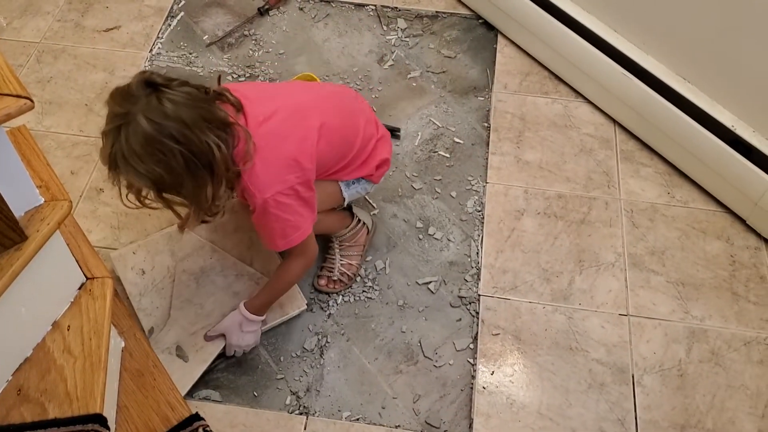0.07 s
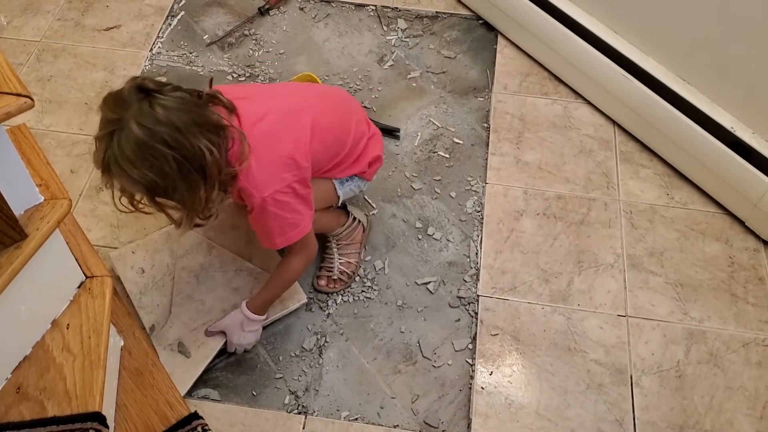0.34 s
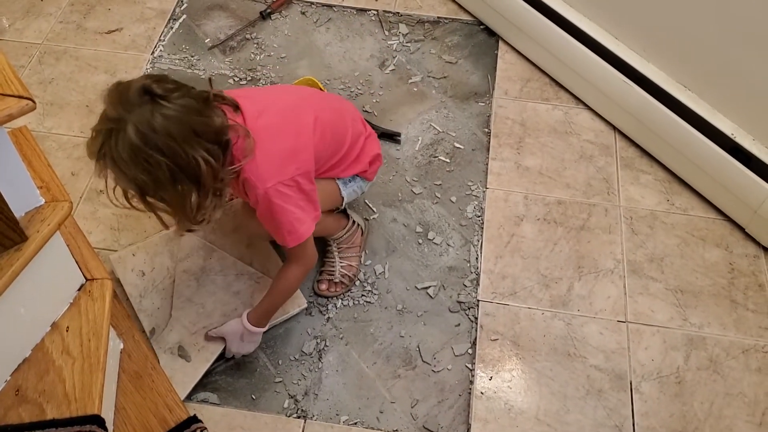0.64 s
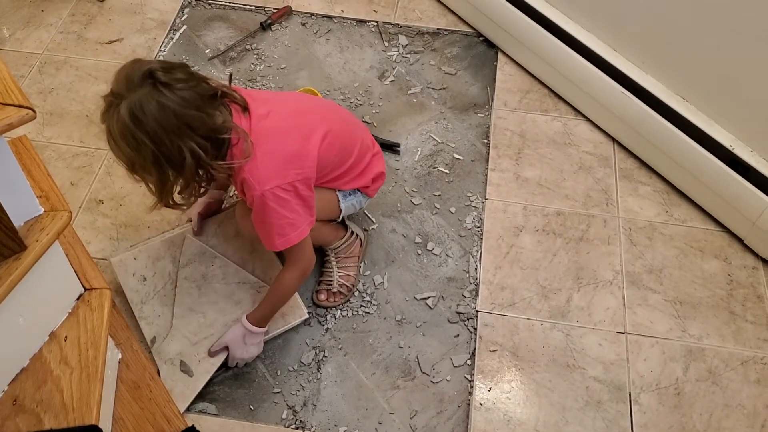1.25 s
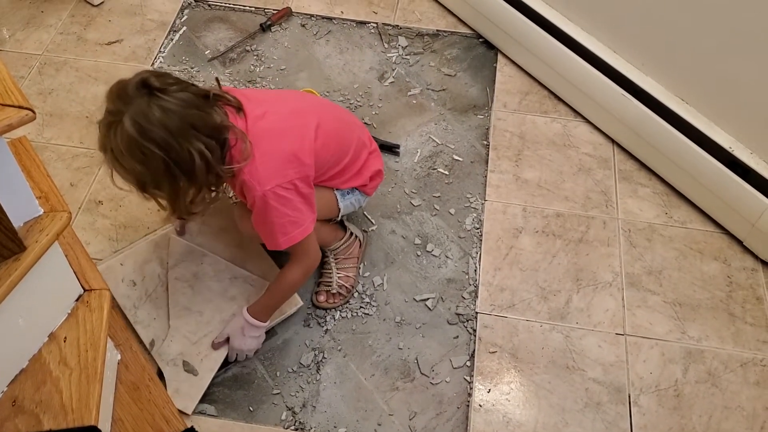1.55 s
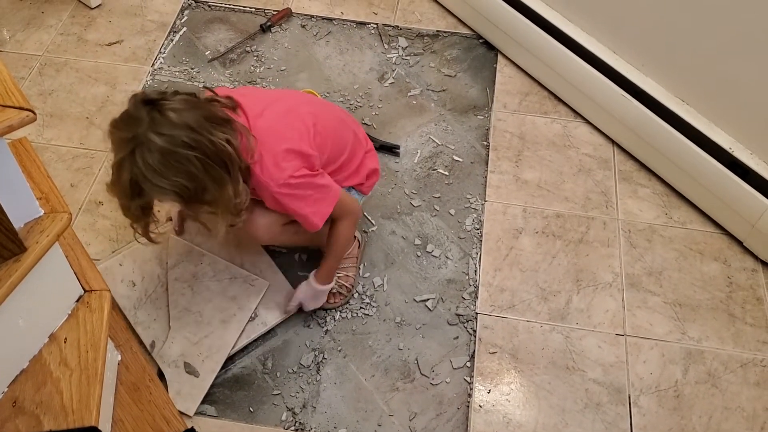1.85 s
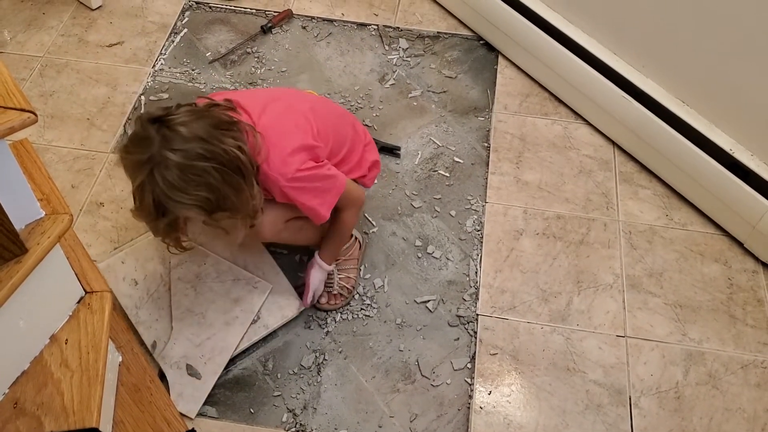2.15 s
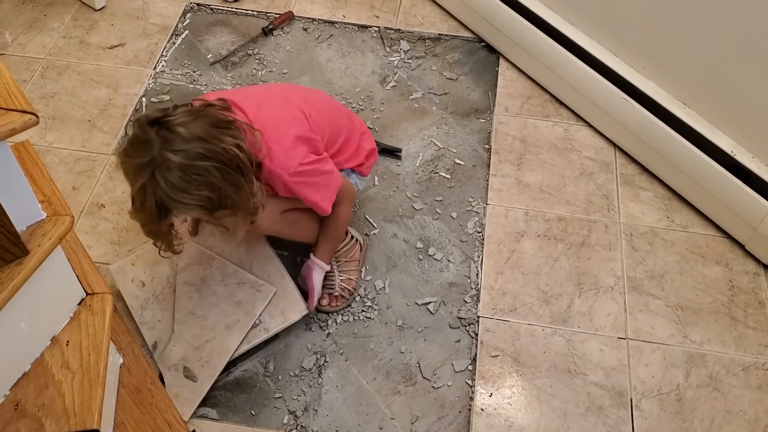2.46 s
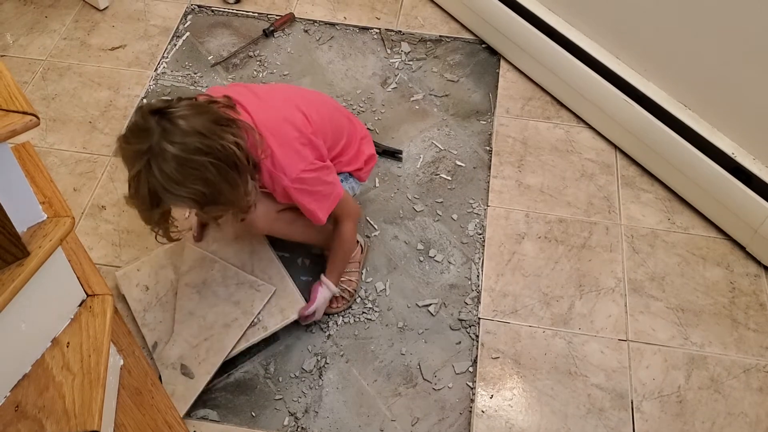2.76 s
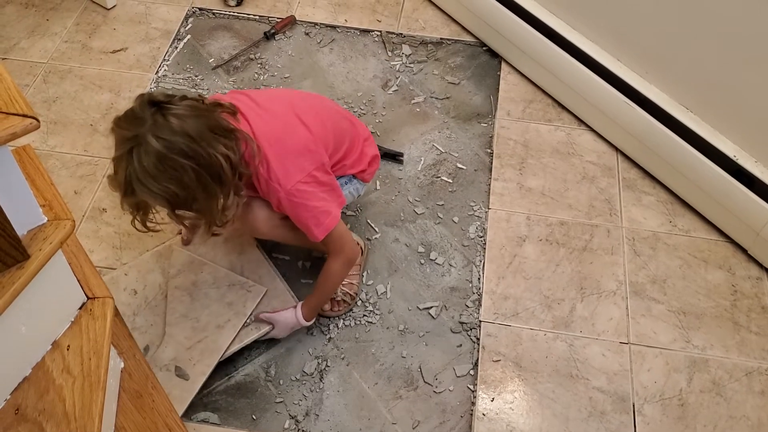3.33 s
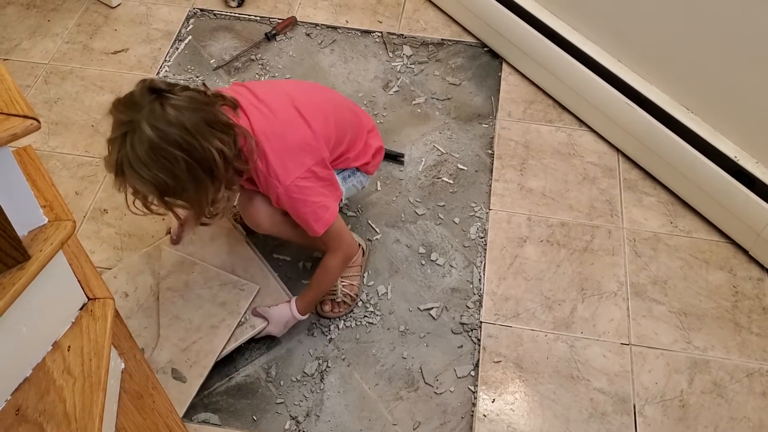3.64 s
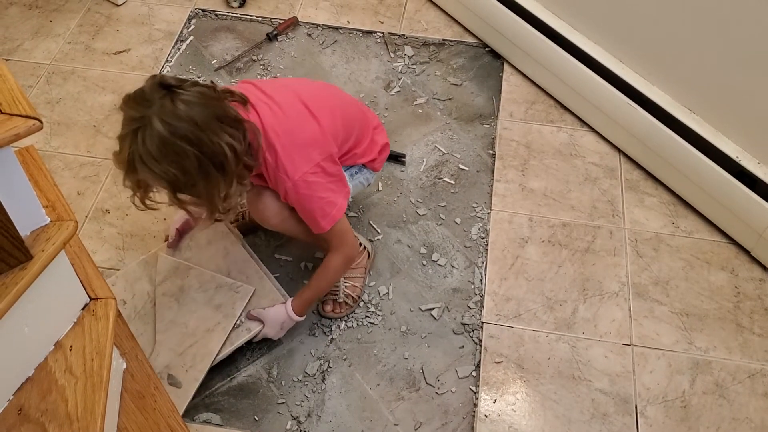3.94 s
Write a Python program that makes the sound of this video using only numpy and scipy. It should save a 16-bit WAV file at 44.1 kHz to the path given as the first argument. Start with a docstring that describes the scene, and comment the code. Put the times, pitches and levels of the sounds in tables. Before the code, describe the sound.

Close, gritty scraping of a floor tile comes in two drags, one long and one short, with a low scuff between. Tile edges clack, then a tile is put down with a heavy rattle that rings in the hard-walled room.

```python
"""A bare, ringing room: heavy ceramic floor tiles are dragged over gritty concrete.
Crushed grit rings the sliding tile, stick-slip makes it groan and squeal, powder hisses under it.
A long drag with one bump is followed by a low scuff and a shorter drag that ends in a bright clack.
After a few light taps a tile is set down on the stack with a heavy rattle, and crumbs settle.
Each knock is a crack of chattering edges plus the tile's decaying modes."""
import sys
import numpy as np
from scipy import signal
from scipy.fft import rfft, irfft, next_fast_len
from scipy.io import wavfile

SR = 44100
rng = np.random.default_rng(int(sys.argv[2]) if len(sys.argv) > 2 else 0)


def master(y):
    """Save y as 16-bit WAV."""
    cut = np.clip(np.atleast_2d(y).T, -1, 1)
    pcm = np.round(cut * 32767)  # scale
    wavfile.write(sys.argv[1], SR, pcm.astype(np.int16))


N = 176400
TIME = np.arange(N) / SR
JUDDER_DB, JUDDER_HZ = 1, 43.6
# stereo side gain against mid (frequency [Hz], gain [dB])
SIDE_GAIN = [(100, -14.5), (280, -14.5), (550, -6), (1100, 0.5), (3000, 1), (14000, 1.5)]


def drags():
    """Two drags: grit shakes the sliding tile, which rings in its resonances."""
    # grinding (time [s], level [dB])
    long_curve = [(0, -20.5), (.1, -22.5), (.25, -20), (.4, -19.5), (.55, -20), (.68, -22), (.82, -18),
                  (.95, -19.5), (1.05, -22), (1.2, -22), (1.32, -26.5), (1.4, -24.5), (1.5, -29.5),
                  (1.6, -31), (1.7, -31), (1.8, -50)]
    short_curve = [(1.68, -46), (1.74, -25), (1.95, -24), (2.05, -22), (2.13, -21.5), (2.18, -25),
                   (2.28, -22.5), (2.32, -26), (2.36, -35), (2.41, -31), (2.44, -27), (2.49, -30.5),
                   (2.6, -33), (2.8, -42.5), (2.87, -54)]
    # spectra (frequency [Hz], level [dB])
    long_tone = [(60, -39), (120, -26), (170, -28), (220, -19), (340, -20), (430, -9), (540, -7), (830, -2),
                 (1200, -5.5), (1600, -3.5), (2300, -2.5), (3600, 0), (5000, -3.5), (6300, -8.5),
                 (8000, -16.5), (16000, -47)]
    short_tone = [(59, -49), (100, -17), (282, -8), (327, -19.5), (621, -2), (695, -10), (994, -3),
                  (1750, -2.5), (2150, -3.5), (4740, -7), (9000, -27.5), (11700, -59), (19800, -120)]
    # tile resonances (frequency [Hz], width [Hz], level [dB])
    resonances = [(636, 28, -2), (870, 180, -1.5), (1045, 170, 3), (1535, 86, 8.5), (1710, 120, 6.5),
                  (1966, 170, 5.5), (2800, 420, -1), (4500, 160, -3)]
    out = np.zeros(N)
    for curve, tone, ring_db in (long_curve, long_tone, -1), (short_curve, short_tone, -7):
        def body_db(f):
            peaks = sum(amp(db + ring_db) ** 2 / (1 + (2 * (f - hz) / width_hz) ** 2)
                        for hz, width_hz, db in resonances)
            return read(tone, f) + 10 * np.log10(1 + peaks)
        out += level(curve) * evened(colour(grit(per_s=2500, spread_db=4), body_db, size=16384))
    return out


def groan():
    """The tile sticks and slips unevenly; each slip rings its bending modes."""
    # stick-slip (time [s], level [dB], slip rate [1/s])
    slip_curve = [(0.082, -42, 76), (.18, -39, 74), (.29, -39, 77), (.361, -37, 82), (.548, -32.5, 83),
                  (.66, -34, 80), (0.759, -29.5, 84.4), (.89, -28.5, 83), (0.982, -34, 90),
                  (1.061, -34, 66), (1.249, -46, 81), (1.35, -60, 69)]
    # bending modes (frequency [Hz], width [Hz], level [dB])
    bending_modes = [(165.3, 6.4, -6.5), (565, 10, -5), (655, 11, 6.5), (786, 18, 3.5), (796, 22, 6),
                     (844, 20, 5.5), (915, 12, -1), (1580, 32, -9), (1630, 17, -11), (1840, 43, 0),
                     (3014, 42, -1)]
    times_s, _, slips_per_s = np.transpose(slip_curve)
    cycles = np.cumsum(np.interp(TIME, times_s, slips_per_s) * (1 + .018 * wobble(60))) / SR
    slips = np.diff(np.floor(cycles), prepend=0) * amp(2 * rng.standard_normal(N))
    t = TIME[:SR // 4]
    body = sum(amp(db) * width_hz * np.exp(-np.pi * width_hz * t) * np.sin(2 * np.pi * hz * t)
               for hz, width_hz, db in bending_modes)
    body = signal.sosfilt(signal.butter(4, 144, "high", fs=SR, output="sos"), body)
    return level(slip_curve) * evened(signal.fftconvolve(slips, body)[:N])


def tile_drop():
    """A tile lands on the stack and rocks to rest: (cracks, ringing)."""
    # contacts (time [s], crack [dB], ring [dB], chatter [s], tilt [dB/octave])
    hits = [(3.332, -50, -69, .017, -6), (3.358, -27.5, -35.5, 0.012, 0.5), (3.376, -30, -37, 0.044, -1.5),
            (3.398, -30, -30.5, .027, -2), (3.432, -31.5, -41, 0.043, -2.5), (3.5, -38.5, -57, 0.1, -1.5)]
    # spectrum (frequency [Hz], level [dB])
    crack_tone = [(24, -54), (40, -45), (174, -24), (213, -44), (260, -15.5), (340, -35), (420, -21),
                  (500, -15.5), (700, -12.5), (830, -11), (1000, -9.5), (1400, -8.5), (1900, -9),
                  (2710, -10), (5170, -17), (6200, -23), (7400, -36), (11500, -36.5), (15500, -50)]
    # (frequency [Hz], level [dB], t60 [s])
    tile_modes = [(546, 8, .45), (643, -2, .35), (812, 5, .42), (926, -5, .5), (1420, 1, .25),
                  (1553, -2, .16), (1760, -4, .38), (2210, -7, .4), (2514, -11, .4), (2633, -1, .25),
                  (2960, -9, .45), (5157, -13, .3)]
    return cracks(hits, crack_tone, first_touch=.15), ringing(hits, tile_modes)


def tile_clack():
    """Tile edge strikes tile edge: (cracks, ringing)."""
    # contacts (time [s], crack [dB], ring [dB], chatter [s], tilt [dB/octave])
    hits = [(2.508, -31, -47, .0085, 3), (2.514, -28.5, -37, 0.015, 0.5), (2.548, -37, -38.5, 0.059, -1.5)]
    # spectrum (frequency [Hz], level [dB])
    crack_tone = [(35, -59), (60, -16.5), (285, -11.5), (509, -28), (688, -22), (900, -3), (1100, -9),
                  (1500, -11), (2000, -2), (3200, -2.5), (4220, -7), (4630, -6.5), (6200, -14.5),
                  (8280, -30.5), (12300, -29.5), (15500, -41)]
    # (frequency [Hz], level [dB], t60 [s])
    tile_modes = [(275, -19, .48), (908, 0, .25), (987, 3, .65), (1006, 0, .5), (1900, -5, .35),
                  (1941, -5, .25), (2030, -3, .5), (2902, -5, .25), (3000, -7, .3), (3270, -6, .3),
                  (3838, -6, .22), (4592, -2, .16)]
    return cracks(hits, crack_tone, first_touch=.14), ringing(hits, tile_modes)


def tile_bump():
    """The dragged tile trips over a ridge: (cracks, ringing)."""
    # contacts (time [s], crack [dB], ring [dB], chatter [s], tilt [dB/octave])
    hits = [(.406, -37.5, -42, .012, -7.5), (.417, -32, -32.5, 0.013, -1.5), (.431, -40.5, -41, 0.0081, -6)]
    # spectrum (frequency [Hz], level [dB])
    crack_tone = [(100, -28), (350, -8), (600, -3.5), (900, 3.5), (1750, 4), (2300, 1.5), (5000, -28),
                  (15000, -50)]
    # (frequency [Hz], level [dB], t60 [s])
    tile_modes = [(811, -6, .2), (956, -0.5, 0.29), (1170, -3, .18), (1280, -5, 0.1), (1440, 2, 0.15),
                  (1685, 1.5, 0.12)]
    return cracks(hits, crack_tone, first_touch=.36), ringing(hits, tile_modes)


def cracks(hits, tone, first_touch):
    """Each contact gives a broad crack as the edges chatter."""
    out = np.zeros(N)
    for start_s, db, _, chatter_s, db_per_octave in hits:
        def crack_db(hz):
            return read(tone, hz) + db_per_octave * np.log2(np.clip(hz, 400, 8000) / 1000)
        crack = colour(contact(chatter_s, first_touch), crack_db)
        add(out, start_s, amp(db) * np.sqrt(SR) * unit(crack))
    return out


def ringing(hits, modes):
    """Each contact feeds energy into the tile's modes, which ring down."""
    out = np.zeros(N)
    for hz, mode_db, t60_s in modes:
        decay = unit(amp(-60 * TIME[:SR] / t60_s))
        energy = np.zeros(N)
        for start_s, _, ring_db, _, _ in hits:
            add(energy, start_s, SR * (amp(ring_db + mode_db) * decay) ** 2)
        out += np.sqrt(2 * energy) * np.sin(2 * np.pi * (hz * TIME + rng.random()))
    return out / np.linalg.norm([amp(db) for _, db, _ in modes])


def scuffs():
    """Close rubbing: (low rumble, thin high rasp)."""
    # (time [s], rumble [dB], rasp [dB])
    rub_curve = [(0, -24.5, -19.5), (.04, -31.5, -27), (.08, -48, -57), (.7, -55, -52), (.9, -72, -50),
                 (1.3, -47, -65), (1.4, -32, -49), (1.48, -40.5, -63), (1.68, -40, -65),
                 (1.715, -28, -27.5), (1.81, -26.5, -22), (1.92, -27, -27.5), (1.98, -28, -35.5),
                 (2.2, -48, -44), (2.5, -40, -62), (2.7, -70, -69)]
    # spectra (frequency [Hz], level [dB])
    rumble_tone = [(30, -24), (65, -5), (100, -4.5), (150, 1.5), (260, 1.5), (400, 5.5), (900, 4.5),
                   (1600, 1), (4000, -33), (12000, -50)]
    rasp_tone = [(4000, -19.5), (8500, -21), (9900, -15.5), (11200, -17), (11750, -8), (12080, 3),
                 (12500, -10), (13400, -13), (14200, -19), (16000, -24)]
    rumble = level(rub_curve) * diffuse(rumble_tone) * amp(JUDDER_DB * wobble(JUDDER_HZ))
    grains = np.array([toned(grit(per_s=3300, spread_db=3), rasp_tone) for _ in range(2)])
    rasp = level(rub_curve, column=2) * grains
    return rumble, rasp * amp([[2.5], [-2.5]])


def powder():
    """Fine dust hisses under the moving tile."""
    # (time [s], level [dB])
    hiss_curve = [(0, -33), (.3, -31.5), (.55, -30), (.73, -28.5), (.9, -31.5), (1.15, -34.5), (1.4, -36),
                  (1.52, -42.5), (1.65, -39.5), (2.0, -38), (2.3, -41.5), (2.38, -43), (2.45, -44),
                  (2.6, -56), (2.8, -50.5), (2.87, -73), (3.1, -61.5), (3.25, -53.5), (3.32, -78)]
    # spectrum (frequency [Hz], level [dB])
    hiss_tone = [(3000, -20), (6500, -14), (8500, -1.5), (10000, 2.5), (11000, 1), (12300, 4), (14000, -4),
                 (16000, -7.5)]
    return level(hiss_curve) * toned(grit(per_s=6900, spread_db=.5), hiss_tone)


def grates(grains_per_s=4200, edge_s=.018):
    """Grains crushed under an edge tick through one resonance: short, rough rasps."""
    # (time [s], length [s], centre [Hz], width [Hz], level [dB])
    caught_grit = [(.9, 0.14, 1720, 549.5, -29.5), (2.177, 0.093, 4850, 450, -30),
                   (2.185, 0.064, 6500, 1500, -40), (2.25, 0.082, 3700, 220, -29),
                   (2.404, 0.047, 5200, 400, -31.5), (3.557, .13, 12900, 200, -63),
                   (3.781, 0.1, 11700, 1500, -54.5), (3.884, 0.038, 10900, 400, -48),
                   (3.887, 0.036, 7800, 600, -59), (3.885, 0.053, 13000, 3000, -56)]
    t, out = TIME[:SR // 2], np.zeros(N)
    for start_s, length_s, hz, width_hz, db in caught_grit:
        grains = rng.standard_normal(len(t)) * (rng.random(len(t)) < grains_per_s / SR)
        rasp = colour(grains, lambda f: -10 * np.log10(1 + ((f - hz ** 2 / (f + 1)) / width_hz) ** 2))
        gate = np.clip(np.minimum(t, length_s - t) / edge_s, 0, 1)
        add(out, start_s, amp(db) * gate * evened(rasp))
    return out


def squeaks(edge_s=.0069):
    """Friction holds one mode in a short, unsteady squeal."""
    # (time [s], length [s], pitch [Hz], width [Hz], level [dB])
    squeals = [(.184, .18, 570.4, 8.1, -32), (.2, 0.11, 785, 20, -29), (0.553, 0.38, 7800, 120, -38),
               (2.238, 0.31, 624, 13.6, -38.5), (3.218, 0.11, 2880, 150, -45),
               (3.223, 0.067, 3660, 180, -43), (3.234, .15, 863, 43, -45), (3.26, 0.069, 564, 25, -46),
               (3.262, .1, 1647, 150, -47)]
    t, out = TIME[:SR // 2], np.zeros(N)
    for start_s, length_s, hz, width_hz, db in squeals:
        gate = np.clip(np.minimum(t, length_s - t) / edge_s, 0, 1)
        cycles = np.cumsum(hz + .5 * width_hz * wobble(width_hz, len(t))) / SR
        falter = 1 + .45 * wobble(width_hz, len(t))
        add(out, start_s, amp(db) * gate * falter * np.sin(2 * np.pi * cycles))
    return out


def taps(skirt_db=-19, top_hz=3720):
    """Light bumps of a hand-held tile: one damped, broad resonance each."""
    # contacts (time [s], level [dB], centre [Hz], width [octaves], chatter [s])
    hits = [(2.992, -48.5, 1500, 0.31, 0.0029), (3.029, -55.5, 1170, 0.84, 0.039),
            (3.222, -49.5, 1610, 0.14, .014), (3.238, -52.5, 2360, 1.2, 0.019),
            (3.81, -52.5, 630, 1.1, 0.03), (3.891, -58, 3500, 3.8, .02), (3.912, -57, 1100, 3.2, 0.013)]
    out = np.zeros(N)
    for start_s, db, centre_hz, octaves, chatter_s in hits:
        def body_db(hz):
            bell = np.exp(-.5 * (np.log2((hz + 1) / centre_hz) / octaves) ** 2)
            return 20 * np.log10(bell + amp(skirt_db)) - 10 * np.log10(1 + (hz / top_hz) ** 4)
        tap = colour(contact(chatter_s, first_touch=.65), body_db)
        add(out, start_s, amp(db) * np.sqrt(SR) * unit(tap))
    return out


def thuds():
    """The landing tile shakes the floor: a short swell of bass."""
    # (time [s], level [dB], swell [s])
    landings = [(3.375, -44, 0.051)]
    # spectrum (frequency [Hz], level [dB])
    thud_tone = [(25, -23), (50, -4), (68, 5), (100, -2), (170, -14), (300, -29), (1500, -60)]
    out = np.zeros(N)
    for start_s, db, swell_s in landings:
        age = np.maximum(TIME - start_s, 0) / swell_s
        out += amp(db) * age * np.exp(1 - age) * toned(rng.standard_normal(N), thud_tone)
    return out


def room(x, wet_db, change_s, count):
    """Direct sound plus reflections; count responses crossfade in turn as the tile moves."""
    size = next_fast_len(N + SR, real=True)
    wet = 0
    for k in range(count):
        away = abs((TIME / change_s - k) % count - count / 2)
        share = np.cos(np.pi / 2 * np.minimum(away, 1))
        wet = wet + rfft(x * share, size) * rfft(echoes(), size)
    return (x + amp(wet_db) * irfft(wet, size)[:, :N]) / np.sqrt(1 + amp(wet_db) ** 2)


def echoes(onset_s=.0024, early_db=7.5, early_s=.06):
    """Impulse response of hard floor and walls: dense early reflections, then a tail."""
    # (frequency [Hz], t60 [s])
    room_t60 = [(80, 1), (250, 0.8), (1000, 0.52), (3000, 0.7664), (6000, 0.59), (13000, 0.81)]
    hz, t, spectra = signal.stft(rng.standard_normal((2, SR)), SR, nperseg=256)
    decay = amp(-60 * t / read(room_t60, hz)[:, None] + early_db * np.exp(-t / early_s))
    onset = np.minimum(TIME[:SR] / onset_s, 1) ** 2
    mid, side = signal.istft(spectra * decay, SR, nperseg=256)[1][:, :SR] * onset
    return left_right(unit(mid), unit(side))


def background():
    """Faint, steady indoor rumble and hiss."""
    # spectrum (frequency [Hz], level [dB])
    indoor_tone = [(25, -2), (45, -7), (66, 13), (90, -4), (160, -0.5), (400, 3.5), (1500, -4.5),
                   (5000, -6), (15000, -43)]
    return amp(-49.5) * diffuse(indoor_tone)


def grit(per_s, spread_db):
    """Mortar grains crushed under a tile: uneven clicks, modulated by its judder."""
    sizes = amp(spread_db * np.minimum(rng.exponential(1, N), 3)) * rng.choice([-1, 1], N)
    crushed = rng.random(N) < per_s / SR
    return evened(sizes * crushed * amp(JUDDER_DB * wobble(JUDDER_HZ)))


def contact(chatter_s, first_touch, clicks_per_s=1800):
    """A first touch, then a quickly dying chatter of hard edges."""
    clicks = rng.standard_normal(SR) * (rng.random(SR) < clicks_per_s / SR)
    force = unit(clicks * np.exp(-TIME[:SR] / max(chatter_s, .001)))
    force[0] += first_touch
    return unit(force)


def wobble(hz, size=N):
    """Noise low-passed at hz, rms 1."""
    return evened(signal.sosfilt(signal.butter(2, hz, fs=SR, output="sos"), rng.standard_normal(size)))


def diffuse(tone):
    """Coloured stereo noise."""
    mid, side = (toned(rng.standard_normal(N), tone) for _ in range(2))
    return left_right(mid, side)


def left_right(mid, side):
    """Mid/side to stereo: narrow in the bass, wide above."""
    side = colour(side, lambda hz: read(SIDE_GAIN, hz))
    return np.array([mid + side, mid - side])


def colour(x, db_at, size=4096):
    """Causal filter with gain db_at(Hz)."""
    hz = abs(np.fft.fftfreq(size, 1 / SR))
    log_gain = np.log(amp(np.maximum(db_at(hz), -100)))
    impulse = np.fft.ifft(np.exp(np.conj(signal.hilbert(log_gain)))).real
    return signal.fftconvolve(x, impulse[:size // 2])[:len(x)]


def toned(x, tone):
    """Filter by a spectrum table, to rms 1."""
    return evened(colour(x, lambda hz: read(tone, hz)))


def read(table, hz):
    """Interpolate on a log-frequency axis."""
    table_hz, values = np.transpose(table)
    return np.interp(np.log(hz + 1), np.log(table_hz + 1), values)


def level(curve, column=1):
    """Gain over time from a dB column."""
    columns = np.transpose(curve)
    return amp(np.interp(TIME, columns[0], columns[column], right=-100))


def add(mix, start_s, sound):
    """Mix in at start_s."""
    part = mix[max(round(start_s * SR), 0):][:len(sound)]
    part += sound[:len(part)]


def amp(db):
    """dB to gain."""
    return 10 ** (np.asarray(db) / 20)


def evened(x):
    """Scale to rms 1."""
    return x / np.sqrt(np.mean(x ** 2) + 1e-20)


def unit(x):
    """Scale to energy 1."""
    return x / (np.linalg.norm(x) + 1e-12)


def scene():
    """Tile sounds pass through the room; scuffs, thud and background stay dry."""
    rumble, rasp = scuffs()
    sliding = drags() + powder() + grates()
    knocks, rings = np.sum([tile_clack(), tile_drop(), tile_bump()], axis=0)
    noisy = room(sliding + knocks + taps(), wet_db=5.5, change_s=.07, count=3)
    tonal = room(groan() + squeaks() + rings, wet_db=-4, change_s=.299, count=2)
    mix = noisy + tonal + thuds() + rumble + rasp + background()
    return mix * amp([[.3], [-.3]])  # slightly left


def record(dry, low_hz=48, top_hz=15850):
    """Microphone bass roll-off, soft clipping, band limit."""
    heard = signal.sosfilt(signal.butter(3, low_hz, "high", fs=SR, output="sos"), dry)
    rounded = heard / (1 + heard ** 6) ** (1 / 6)
    band_limit = signal.firwin(511, top_hz, window=("kaiser", 9), fs=SR)
    return signal.oaconvolve(rounded, band_limit[None], "same")


dry = scene()
out = record(dry)
master(out)
```